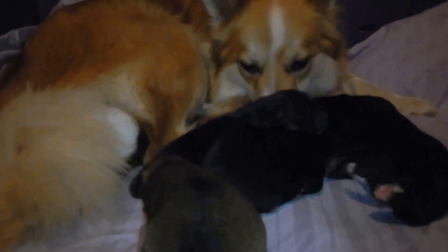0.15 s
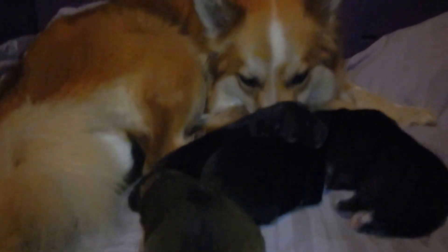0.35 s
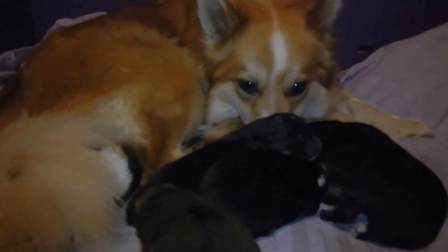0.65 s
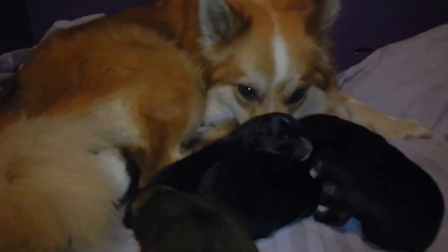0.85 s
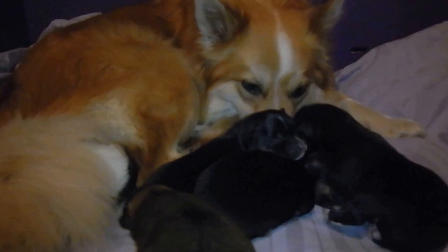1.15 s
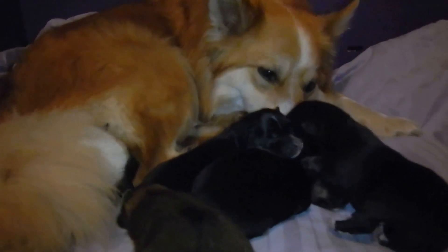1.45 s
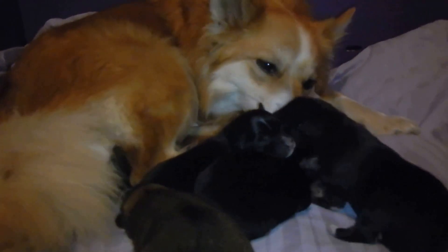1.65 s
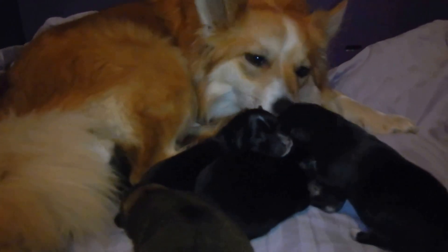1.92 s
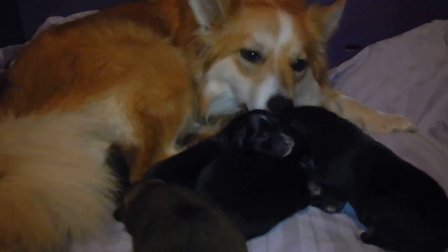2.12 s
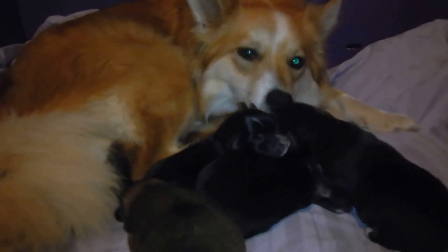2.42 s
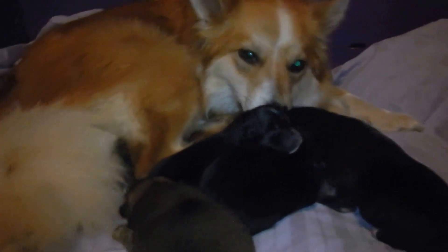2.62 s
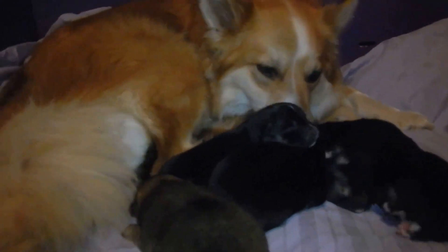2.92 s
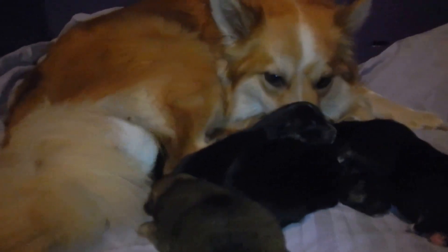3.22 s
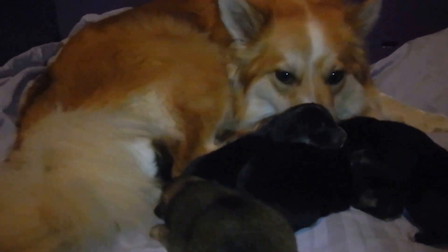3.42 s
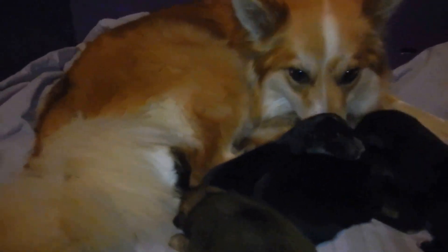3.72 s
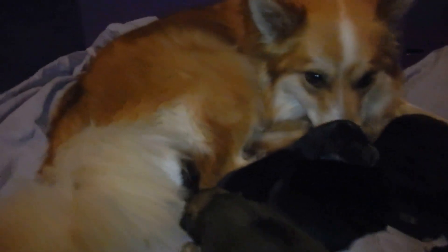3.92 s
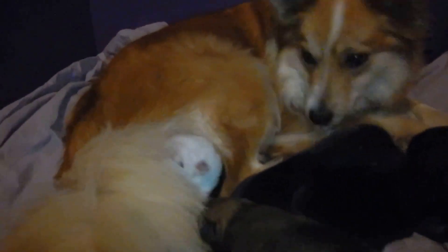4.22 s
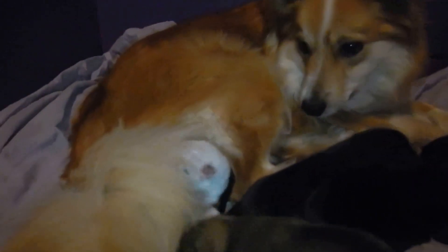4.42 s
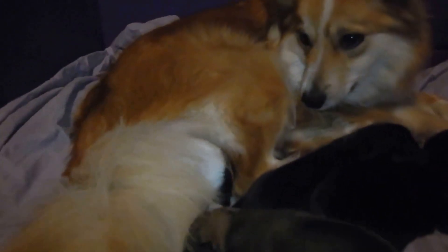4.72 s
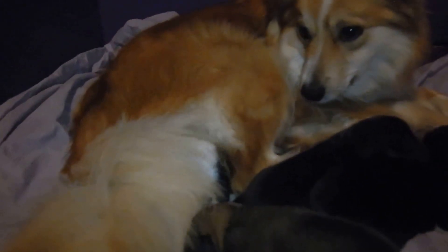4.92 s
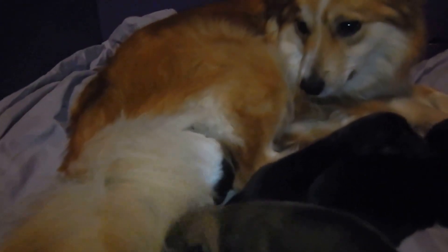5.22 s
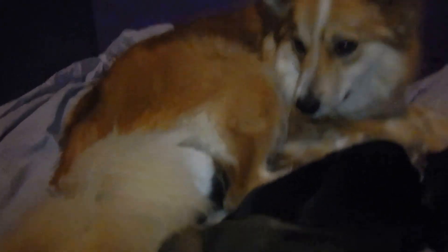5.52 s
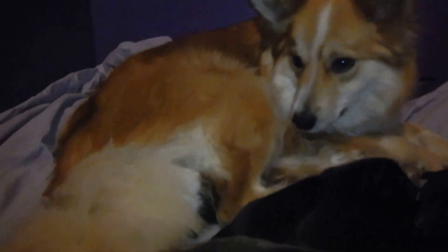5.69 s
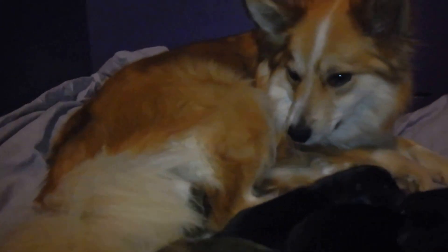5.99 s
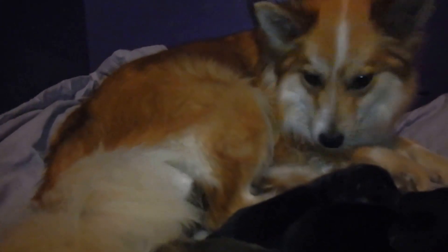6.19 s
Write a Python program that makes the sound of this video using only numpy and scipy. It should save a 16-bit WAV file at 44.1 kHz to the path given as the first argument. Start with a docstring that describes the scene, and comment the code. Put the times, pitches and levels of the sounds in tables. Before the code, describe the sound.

Close to the microphone, newborn puppies give weak, slightly hoarse whimpers, then a sudden high squeak and a run of wavering, overlapping whines. One loud, bright yelp bursts out after four seconds, followed by quieter broken cries and renewed whining. Tiny wet clicks, the mother dog's brief sniffs and soft paw thuds on bedding sit around them. A small bedroom, with low electrical hum, a motor tone and hiss.

```python
"""Newborn puppies cry on a bed close to a camera's microphones: thin, gliding stacks of partials that overlap.
Nearby, filtered noise makes small mouth clicks, the mother's sniffs and paws bumping the bedding.
Behind them lie the bedroom's echo, mains hum, a motor tone settling to speed, air noise and hiss.
The camera turns its gain down when shrill cries get loud and slowly lets it back."""
import sys
import numpy as np
from scipy import signal
from scipy.fft import rfft, irfft, next_fast_len
from scipy.io import wavfile
from scipy.ndimage import uniform_filter1d, map_coordinates

SR = 44100
rng = np.random.default_rng(int(sys.argv[2]) if len(sys.argv) > 2 else 0)


def store_wav(level_fs):
    """Save 16-bit WAV to argv[1]."""
    pcm = np.round(np.clip(np.atleast_2d(level_fs), -1, 1) * 32767)
    wavfile.write(sys.argv[1], SR, pcm.T.astype(np.int16))


N = 280035  # length [samples]


def amp(db):
    """dB to gain."""
    return 10 ** (np.asarray(db) / 20)


def unit(x):
    """Scaled to rms 1."""
    return x / np.sqrt(np.mean(x ** 2) + 1e-20)


def along(points, hz, column=1):
    """A column of (frequency [Hz], ..) points, read on a log frequency axis."""
    p = np.transpose(points)
    return np.interp(np.log(hz + 1), np.log(p[0] + 1), p[column])


def wobble(rate, size=N):
    """A smooth random curve, rate knots a second."""
    knots = rng.standard_normal(int(size * rate / SR) + 4)
    return map_coordinates(knots, [np.arange(size) * rate / SR])


def filtered(x, response):
    """x times a complex response of frequency."""
    m = next_fast_len(N + SR // 2)
    return irfft(rfft(x, m) * response(np.fft.rfftfreq(m, 1 / SR)), m)[..., :N]


def coloured(spectrum):
    """Noise of rms 1 with the spectrum's colour."""
    return unit(filtered(rng.standard_normal(N), lambda hz: amp(along(spectrum, hz))))


# colour of the air noise: (frequency [Hz], relative density [dB per Hz])
AIR_COLOUR = [(20, -31), (40, -17), (70, -7.5), (100, -9), (155, -1.5), (190, -10), (280, -22), (390, -8.5),
              (600, -18.5), (1500, -17), (2600, -20), (4000, -20), (4900, -29), (5700, -26), (7500, -36),
              (15800, -42)]
# how alike it is at the two microphones: (frequency [Hz], left-right correlation)
AIR_LIKENESS = [(60, 0.3), (150, 0.78), (300, 0.44), (1400, 0.45), (3100, 0.082), (15000, .05)]


def air():
    """Room air and microphone hiss: noise alike in the bass, slightly patchy in time and frequency."""
    z = signal.stft(rng.standard_normal((2, N)), nperseg=512)[2]
    patches = uniform_filter1d(rng.standard_normal(z.shape[1:]), 6, 0)
    patches = uniform_filter1d(patches, 14, 1)
    pair = signal.istft(z * amp(1.5 * unit(patches)), nperseg=512)[1][:, :N]

    def mid_and_side(hz):
        # the angle sets the share of mid and side that gives the wanted correlation
        angle = np.arccos(np.clip(along(AIR_LIKENESS, hz), -1, 1)) / 2
        return amp(along(AIR_COLOUR, hz)) * [np.cos(angle), np.sin(angle)]

    mid, side = filtered(pair, mid_and_side)
    stereo = unit(np.array([mid + side, mid - side]))
    return amp(-48.5) * stereo * amp([[.6], [-.6]])  # a little more on the left


# mains lines: (frequency [Hz], level [dB])
MAINS_LINES = [(60, -66), (120, -47)]
# the motor's tone: (time [s], level [dB])
MOTOR_LEVEL = [(0, -65), (.5, -50.5), (2.501, -51), (3.7, -59), (6.35, -60.5)]
# final frequency, how far under it the tone starts, and time constant of the approach
MOTOR_HZ, MOTOR_SHORT_HZ, MOTOR_SETTLES_S = 96.7, 15, .8


def hum():
    """Mains lines, and a motor tone that rises to its final pitch, swells, then fades back."""
    t = np.arange(N) / SR
    mains = np.zeros(N)
    for hz, db in MAINS_LINES:
        start = rng.uniform(0, 2 * np.pi)
        mains += amp(db + 0.46 * wobble(7.1)) * np.sin(2 * np.pi * hz * t + start)
    s, db = np.transpose(MOTOR_LEVEL)
    motor_level = amp(np.interp(t, s, db) + 1.2 * wobble(4))
    motor_hz = MOTOR_HZ - MOTOR_SHORT_HZ * np.exp(-t / MOTOR_SETTLES_S)
    motor = motor_level * np.sin(2 * np.pi * np.cumsum(motor_hz) / SR)
    return np.sqrt(2) * (mains + motor) * amp([[.4], [-.4]])


# how long the bedroom rings: (frequency [Hz], time to fall 60 dB [s])
BEDROOM_DECAY = [(300, 0.42), (2000, 0.23), (5000, 0.4), (10000, 0.21)]


def bedroom(x):
    """The room's answer to the near sounds: noise in which each frequency dies at its own speed."""
    hz, t, z = signal.stft(rng.standard_normal((2, SR // 2)), SR, nperseg=256)
    fall_db = -60 * t / along(BEDROOM_DECAY, hz)[:, None]
    tail = signal.istft(z * amp(fall_db), SR, nperseg=256)[1]
    tail[1] = 0.69 * tail[0] + 0.65 * tail[1]  # the right side is partly like the left
    tail = tail / np.linalg.norm(tail[0])
    late = np.pad(x, (150, 0))[None]  # samples before the answer starts
    return signal.fftconvolve(late, tail, axes=1)[:, :N]


def bursts(events, t60, attack):
    """A short dying puff of noise at each event; t60 and attack in s."""
    out, t = np.zeros(N + SR), np.arange(SR // 8) / SR
    for s, db in events:
        envelope = amp(db - 60 * t / t60) * (1 - np.exp(-t / attack))
        out[round(s * SR):][:len(t)] += envelope * rng.standard_normal(len(t))
    return out[:N]


# paws on the bedding: (time [s], level before the mattress [dB])
PAW_BUMPS = [(0.377, -43), (1.621, -41), (2.778, -43), (3.681, -39.5), (3.928, -41.5), (4.133, -34.5),
             (5.536, -41), (6.239, -33.5)]


def bumps():
    """Paws bump the bed: noise puffs in the broad low resonance of the mattress."""
    def mattress(f, hz=420, width_hz=420):
        damping = 1j * f * width_hz
        return amp(20.0) * (damping / (hz * hz - f * f + damping)) ** 2

    return filtered(bursts(PAW_BUMPS, t60=0.059, attack=0.0018), mattress)


# wet mouth clicks: (time [s], level before the mouth [dB])
MOUTH_CLICKS = [(1.6294, -63), (2.039, -43), (2.0687, -39.5), (2.2134, -36), (2.2692, -29), (4.6608, -24),
                (4.9974, -28), (5.413, -31)]


def clicks():
    """Wet mouth clicks: very short noise puffs, band-limited by the mouth."""
    def mouth(f):
        return amp(4) / (1 + (f / 6800) ** 10) / (1 + (600 / (f + 1)) ** 2)

    return filtered(bursts(MOUTH_CLICKS, t60=0.016, attack=.0002), mouth)


# the mother's sniffs: (time [s], length [s], level [dB])
SNIFF_PULLS = [(4.656, 0.042, -33), (4.974, 0.079, -40), (5.116, 0.06, -45), (5.492, 0.036, -46)]
# colour of air in her nose: (frequency [Hz], relative density [dB per Hz])
NOSE_COLOUR = [(410, -39), (700, -16.5), (1270, -3), (1710, 6), (1860, -6), (4020, 6), (4750, -12),
               (5540, 4.5), (8300, -34), (12000, -52), (15600, -65), (22000, -120)]


def sniffs():
    """Short pulls of air through the nose: quick rise, slower fall."""
    t, flow = np.arange(N) / SR, np.zeros(N)
    for s, length, db in SNIFF_PULLS:
        u = np.clip((t - s) / length, 0, 1)
        flow += amp(db) * 2.2 * u ** .5 * (1 - u)
    return flow * coloured(NOSE_COLOUR)


# hoarse spells: (time [s], length [s], roughness [0-1])
HOARSE_SPELLS = [(.3, .06, .6), (.36, .07, .4), (.43, .05, .65), (.48, .12, .12), (.99, .05, .75),
                 (1.62, .03, .4), (1.67, .025, .4), (2.06, .03, .4), (2.715, .08, .7), (4.125, .145, .05),
                 (4.27, .06, .11), (4.87, .05, .6), (4.92, .05, .1), (5.43, .03, .2)]


def hoarseness():
    """Roughness over time: each spell sets in and ends within a few ms."""
    t, rough = np.arange(N) / SR, np.zeros(N)
    for s, length, depth in HOARSE_SPELLS:
        rough += depth * np.clip(np.minimum(t - s, s + length - t) / 0.0052, 0, 1)
    return rough


# high cries are mostly purer: (pitch [Hz], second partial over the fundamental [dB], third over it [dB])
OVERTONE_RULE = [(430, -6.5, -8), (594, -0.5, -7), (672, -2, -14), (753, 3.5, -5.5), (787, 1, -7.5),
                 (1130, -2.5, -15), (1178, -3, -23), (1291, -14.5, -24.5), (1727, -22, -42),
                 (1696, -26, -34.5), (2080, -24.5, -41), (2330, -42, -41), (2670, -11, -28)]
# a mouth opens wide and frees the overtones: (time [s], length [s], rise [s],
# second partial gains [dB], third partial gains [dB], higher ones gain more than the third [dB])
WIDE_MOUTHS = [(2.287, 0.12, .04, 19, 22.5, 11.5), (4.099, 0.35, 0.051, 24, 40, 1),
               (4.169, 0.18, 0.03, 12.5, 8, -3), (4.76, 0.076, 0.019, 2, 5.5, 7),
               (5.363, .1, .02, 3, 0.5, 2.5), (5.725, 0.037, 0.018, 2.5, 2, 4.5)]
# floor added under the partials above the third, before their colour: (pitch [Hz], over fundamental [dB])
UPPER_FLOOR = [(600, -33), (1200, -44.5), (1700, -32), (2400, -27.5)]
OPEN_S, OPEN_DB = 0.023, -1  # overtones are duller as the mouth opens at the start of a glide
CLOSE_S, CLOSE_DB = 0.026, -9.5  # and as it shuts at the end
GAPE_ENDS_S = 0.0071  # a wide mouth narrows again this fast
THIRD_WAVERS_DB = 2  # the third partial is unsteady


def overtones(t, pitch, second_db, third_db):
    """Gains of the second, third and higher partials: set by pitch, the glide's own colour and the mouth."""
    shut_db = CLOSE_DB * np.clip(1 - (t[-1] - t) / CLOSE_S, 0, 1)
    shut_db = shut_db + OPEN_DB * np.clip(1 - (t - t[0]) / OPEN_S, 0, 1)
    second_db = along(OVERTONE_RULE, pitch) + second_db + shut_db
    third_db = along(OVERTONE_RULE, pitch, column=2) + third_db + shut_db
    top_db = 0
    for s, length, rise, second_gain, third_gain, top_gain in WIDE_MOUTHS:
        gape = np.clip(np.minimum((t - s) / rise, (s + length - t) / GAPE_ENDS_S), 0, 1)
        second_db = second_db + second_gain * gape
        third_db = third_db + third_gain * gape
        top_db = top_db + top_gain * gape
    third = amp(third_db + THIRD_WAVERS_DB * wobble(40.6, size=len(t)))
    higher = amp(third_db + top_db) + amp(along(UPPER_FLOOR, pitch))
    return amp(second_db), third, higher


def glide(s, hz, t):
    """A rounded curve through the points that rests at each turning point."""
    d = np.diff(hz) / np.diff(s)
    # harmonic mean of neighbouring slopes, or flat where the direction turns
    inner = np.where(d[1:] * d[:-1] > 0, 2 * d[1:] * d[:-1] / (d[1:] + d[:-1] + 1e-9), 0)
    slope = np.r_[d[0], inner, d[-1]]
    k = np.clip(np.searchsorted(s, t) - 1, 0, len(d) - 1)
    h = s[k + 1] - s[k]
    u = (t - s[k]) / h
    bend = (1 - u) * (slope[k] - d[k]) - u * (slope[k + 1] - d[k])
    return hz[k] + h * u * (d[k] + (1 - u) * bend)


# one entry an unbroken glide; a cry that jumps in pitch takes several:
# (second partial over the rule [dB], third partial over the rule [dB],
# rows of (time [s], pitch [Hz], fundamental level [dB]))
CRY_GLIDES = [ (-11, -10, [(0.22, 814, -51.5), (0.26, 827, -53), (0.3, 770, -53), (0.315, 700, -56)]),
              (4, 6, [(0.31, 447, -50), (0.35, 644, -55.5), (0.41, 660, -54), (0.445, 558.6, -48.5),
              (0.465, 521, -55.5), (0.485, 652, -52), (0.52, 628, -52.5), (0.59, 541, -51.5)]),
              (-11, -15, [(0.54, 785, -60), (0.6, 848, -45)]), (6, -1.5, [(0.603, 755, -59),
              (0.63, 701, -52.5), (0.68, 689, -50.5), (0.73, 760, -54.5), (0.78, 733, -53.5),
              (0.845, 826, -50.5), (0.88, 755, -52), (0.96, 738.5, -50), (1.0, 670, -47), (1.01, 517, -51),
              (1.035, 457, -44)]), (-23, -20, [(0.99, 1020, -45), (1.02, 990, -41.5)]),
              (-1.5, 1.5, [(1.285, 1180, -50), (1.3, 875, -44), (1.32, 753, -45.5), (1.345, 707, -44)]),
              (-8.5, -10, [(1.59, 1103, -43), (1.61, 1234, -52.5), (1.63, 1150, -48.5), (1.66, 1220, -59)]),
              (-3, -7, [(1.672, 980, -52), (1.68, 900, -46), (1.69, 811, -44), (1.72, 791, -45.5),
              (1.74, 815, -40.5)]), (-6.5, 0.5, [(1.957, 1234, -44.5), (1.97, 930, -42.5),
              (2.08, 1431, -46.5), (2.12, 1439, -41), (2.19, 1140, -47), (2.245, 1137, -40)]),
              (5.5, 4, [(2.072, 702, -47.5), (2.1, 647, -50), (2.125, 511, -46), (2.15, 431.5, -44.5),
              (2.212, 411, -41.5)]), (-5.5, 0, [(2.203, 1586, -31), (2.24, 1300, -27.5), (2.28, 1680, -29),
              (2.32, 1830, -26.5), (2.35, 2094, -18), (2.375, 2155, -19), (2.403, 2480, -24)]),
              (0, -10, [(2.405, 2766, -25.5), (2.43, 2748, -33), (2.48, 2520, -47.5), (2.54, 2716, -51.5),
              (2.57, 2630, -45), (2.595, 2400, -48)]), (-18, 3, [(2.5, 833, -45.5), (2.53, 919, -50.5),
              (2.55, 1230, -56)]), (9, 8, [(2.597, 2545, -38.5), (2.62, 2225, -29), (2.66, 2204, -30),
              (2.712, 1822, -30.5)]), (-2, -10, [(2.65, 920, -55.5), (2.72, 800, -50.5)]),
              (-6, 1, [(2.715, 1440, -55), (2.76, 1290, -52)]), (-10, -6, [(2.778, 1057, -47),
              (2.793, 950, -53)]), (2, -5, [(2.81, 2530, -47.5), (2.89, 2420, -69)]),
              (0, -1.5, [(2.963, 1760, -44), (2.98, 1666, -30), (3.0, 1207, -33), (3.035, 1019, -32.5),
              (3.06, 1073, -40.5), (3.09, 1312, -31), (3.12, 1430, -32), (3.195, 1820, -36),
              (3.25, 1590, -26.5), (3.27, 1246, -53)]), (-3, -12, [(3.0, 1164, -32), (3.05, 1210, -29.5),
              (3.09, 1358, -29), (3.115, 1640, -29), (3.15, 1524, -29), (3.2, 1709, -29.5),
              (3.25, 1738, -31.5), (3.31, 1564, -29.5), (3.38, 1821, -30), (3.43, 1600, -28),
              (3.51, 1770, -28), (3.57, 1642, -29), (3.62, 1567, -29), (3.67, 1746, -28.5),
              (3.7, 1723, -30.5), (3.74, 1550, -27), (3.76, 1400, -46)]), (-1.5, 3.5, [(3.465, 1275, -37.5),
              (3.49, 1279, -34.5), (3.53, 1297, -33.5), (3.57, 1540, -31.5), (3.61, 1747, -34.5),
              (3.65, 2000, -31.5), (3.7, 2130, -31), (3.75, 2151, -30.5), (3.79, 2233, -30.5),
              (3.84, 2187, -30), (3.87, 2216, -32), (3.93, 2172, -27.5), (3.95, 1970, -25.5),
              (3.965, 1170, -42.5)]), (-4, -8.5, [(4.003, 1634, -29), (4.03, 1444, -15.5),
              (4.06, 1212, -15), (4.08, 1097, -16.5), (4.11, 1278, -13.5), (4.13, 1424, -15),
              (4.14, 1497, -10.5), (4.17, 1596, -13.5), (4.2, 1776, -16), (4.235, 1835, -13.5),
              (4.26, 1815, -14.5), (4.28, 1871, -12.5), (4.3, 1968, -20), (4.312, 2074, -11.5),
              (4.322, 2130, 1)]), (-3, -20.5, [(4.321, 1694, -16), (4.352, 1680, -14)]),
              (-53, -64, [(4.33, 2470, -20), (4.4, 2580, -47.5)]), (-21, -6, [(4.457, 2510, -56),
              (4.47, 2493, -34.5), (4.545, 2376, -41), (4.556, 1970, -37)]), (1.5, 5, [(4.558, 1442, -39),
              (4.6, 1195, -31.5), (4.636, 1325, -35.5)]), (-9.5, -4, [(4.638, 1080, -16.5),
              (4.66, 1040, -30.5)]), (1.5, 0.5, [(4.757, 1626, -36.5), (4.77, 1244, -37), (4.79, 1170, -39),
              (4.83, 1227, -41.5), (4.87, 1242, -35.5), (4.9, 1183, -35), (4.92, 1170, -44),
              (4.94, 1041, -34.5), (4.972, 773, -36)]), (-30, -25, [(4.968, 773, -26), (4.99, 686, -34.5)]),
              (-4.5, -0.5, [(5.245, 1229, -40.5), (5.26, 957, -40), (5.3, 1087, -33), (5.34, 1148, -42.5),
              (5.37, 1185, -28), (5.4, 1077, -35.5), (5.44, 992, -35.5), (5.45, 722, -39)]),
              (0, -1, [(5.325, 1626, -36), (5.345, 1612, -31), (5.36, 1322, -30.5), (5.375, 1167, -40.5),
              (5.4, 1167, -26), (5.43, 1251, -32.5), (5.465, 1372, -22.5), (5.478, 1352, -24),
              (5.484, 1056, -26.5), (5.495, 1096, -39.5)]), (-4.5, -4, [(5.648, 1351, -35.5),
              (5.685, 1335, -26.5), (5.74, 1100, -21), (5.79, 1286, -31), (5.83, 1106, -27.5),
              (5.87, 1128, -37), (5.965, 1190, -35)]), (3.5, 6, [(5.698, 1734, -32), (5.73, 1480, -20),
              (5.755, 1346, -27), (5.79, 1409, -18.5), (5.83, 1522, -25.5), (5.89, 1800, -25.5),
              (5.945, 2050, -25), (5.99, 1860, -21), (6.05, 2074, -21.5), (6.065, 1520, -27.5),
              (6.073, 1456, -27.5)]), (-4.5, -14, [(6.193, 1090, -39.5), (6.205, 1000, -38.5),
              (6.245, 1169, -32), (6.285, 1080, -28), (6.32, 1179, -32.5), (6.349, 1216, -30.5)]),
              (11.5, 9.5, [(6.275, 1713, -33.5), (6.295, 1742, -31), (6.31, 1550, -26.5),
              (6.335, 1446, -31.5), (6.349, 1464, -18)]), ]
# colour of the partials above the third: (frequency [Hz], gain [dB])
UPPER_COLOUR = [(1500, -23.5), (3000, -5), (3600, -14.5), (5000, -25.5), (5800, -12), (7200, -18.5),
                (8300, -62), (11000, -31.5), (15000, -39)]
# colour of the air in a cry: (frequency [Hz], relative density [dB per Hz])
BREATH_COLOUR = [(300, -13.5), (1200, -12.5), (4000, -2), (5600, -4), (7500, -11), (8500, -30),
                 (11000, -16), (15500, -35)]
UPPER_FALL_DB = 3  # each higher partial under the one before


def puppies():
    """Small vocal folds give a nearly pure stack of partials; bright cries leak pulsing air."""
    voice, leak, hoarse = np.zeros(N), np.zeros(N), hoarseness()
    for second_db, third_db, rows in CRY_GLIDES:
        s, hz, db = np.transpose(rows)
        s = np.sort(s + 1e-4 * np.arange(len(s)))  # keeps the times apart
        n = np.arange(int(s[0] * SR), min(int(s[-1] * SR), N))
        t, rough, size = n / SR, hoarse[n], len(n)
        # hoarse folds lose their beat: pitch and size scatter from cycle to cycle
        scatter = .002 * wobble(150, size) + .12 * rough * wobble(500, size)
        pitch = glide(s, hz, t) * (1 + scatter)
        phase = 2 * np.pi * np.cumsum(pitch) / SR
        edge = np.clip(np.minimum(t - s[0], s[-1] - t) / 0.002, 0, 1)
        flutter_db = .8 * wobble(120, size) + 5 * rough * wobble(300, size)
        level = edge * amp(np.interp(t, s, db) + flutter_db) * np.sqrt(2)
        level = level * (1 + .7 * rough * wobble(700, size))

        second, third, higher = overtones(t, pitch, second_db, third_db)
        k = np.arange(4, 10)[:, None]  # partial numbers above the third
        upper_db = along(UPPER_COLOUR, k * pitch) - UPPER_FALL_DB * (k - 5.5)
        upper = higher * amp(upper_db) * (k * pitch < SR / 2) * np.cos(k * phase)
        # the weak high partials come and go, each on its own
        upper = upper * amp(5 * np.array([wobble(200, size) for _ in k]))
        stack = np.cos(phase) + second * np.cos(2 * phase) + third * np.cos(3 * phase)
        voice[n] += level * (stack + upper.sum(axis=0))
        # air escapes once a cycle, more when the third partial is strong
        leak[n] += level * (amp(-43) + amp(-28) * third) * (1 + np.cos(phase))
    # so small a head radiates no bass
    voice = filtered(voice, lambda f: 1 / (1 + (330 / (f + 1)) ** 8))
    return voice + leak * coloured(BREATH_COLOUR)


# near sounds at the two microphones: (frequency [Hz], left over right [dB], left leads [radians])
STEREO_PLACE = [(500, 0, 0.36), (1300, 1.5, 0.021), (2400, 0.3, 0.23), (4230, 4.5, 1.2), (6000, 2, 0.81),
                (12000, 4.5, 1.7)]


def scene():
    """The animals lie close by, a little to the left; the two sides differ most in the treble."""
    near = puppies() + sniffs() + clicks() + bumps()

    def sides(hz):
        # each side takes half of the difference
        left = amp(along(STEREO_PLACE, hz) / 2) * np.exp(.5j * along(STEREO_PLACE, hz, column=2))
        return [left, 1 / left]

    return filtered(near, sides) + amp(-15) * bedroom(near) + hum() + air()


def gain_control(x, limit_db=-32, attack=0.066, release_db=17, size=88):
    """Shrill sound over the limit pulls the gain down quickly (attack [s]); it climbs back at release_db a second."""
    shrill = np.diff(x.mean(axis=0), 2, prepend=[0, 0])  # second difference favours treble
    power = np.abs(uniform_filter1d(shrill ** 2, 900))[::size]
    level_db = 10 * np.log10(power + 1e-12)
    step_s = size / SR
    gain_db, g = np.zeros(len(level_db)), 0
    for i, wanted in enumerate(np.minimum(limit_db - level_db, 0)):
        if wanted < g:
            g = g + (wanted - g) * step_s / attack
        else:
            g = min(g + release_db * step_s, wanted)
        gain_db[i] = g
    return x * amp(np.interp(np.arange(N), np.arange(len(gain_db)) * size, gain_db))


# resonances of the microphone housing: (frequency [Hz], width [Hz], gain at the centre [dB])
HOUSING_CAVITIES = [(2702, 27, 4.5), (3207, 715, -14), (3164, 48, -11), (4525, 430, -10)]
TOP_HZ = 15770  # nothing passes above this


def record(dry):
    """Cavities in the housing cut notches and raise one narrow peak; then gain control and the band limit."""
    def housing(f):
        response = 1
        for hz, width_hz, db in HOUSING_CAVITIES:
            spring, damping = hz * hz - f * f, 1j * f * width_hz
            response = response * (spring + damping * amp(db)) / (spring + damping)
        return response

    return filtered(gain_control(filtered(dry, housing)), lambda hz: hz < TOP_HZ)


dry = scene()
out = record(dry)
store_wav(out)
```